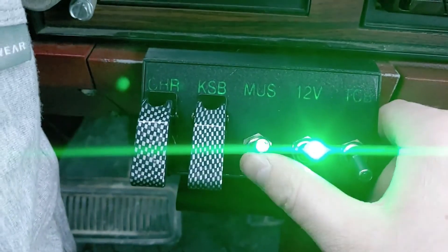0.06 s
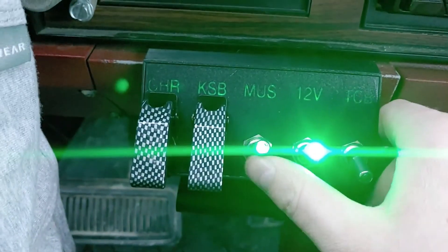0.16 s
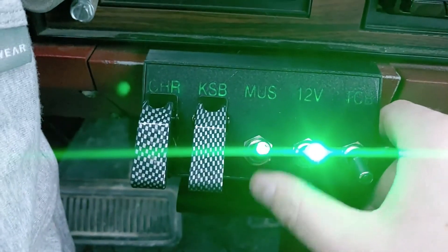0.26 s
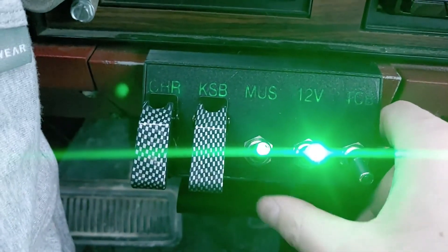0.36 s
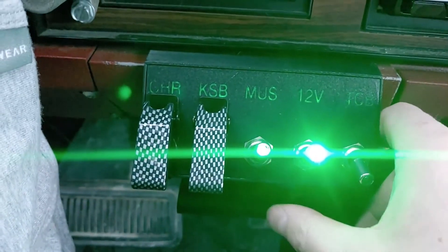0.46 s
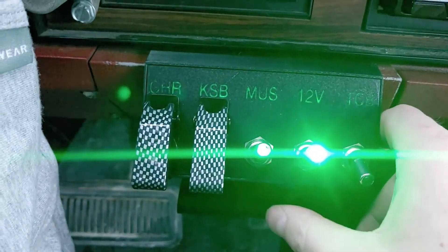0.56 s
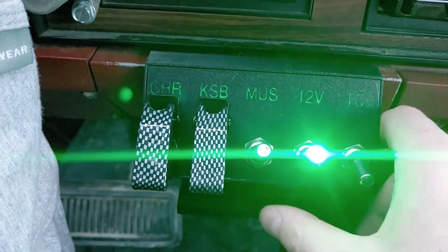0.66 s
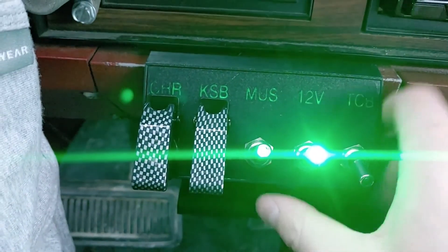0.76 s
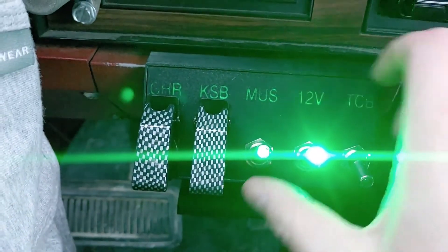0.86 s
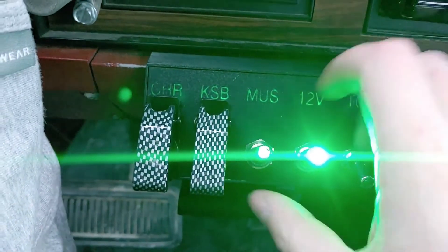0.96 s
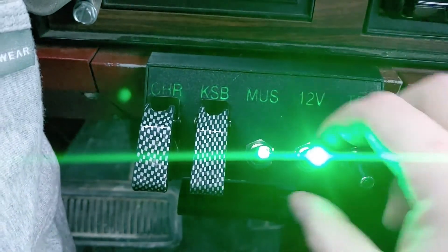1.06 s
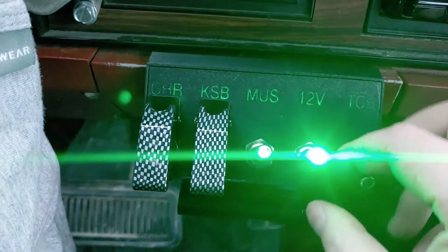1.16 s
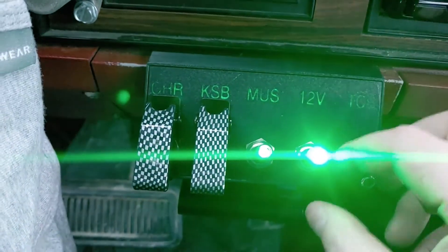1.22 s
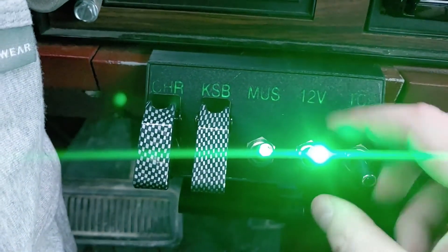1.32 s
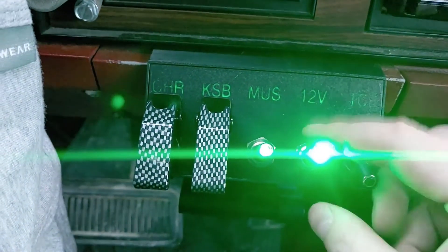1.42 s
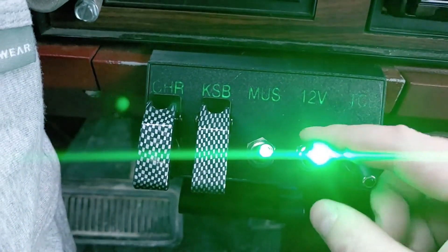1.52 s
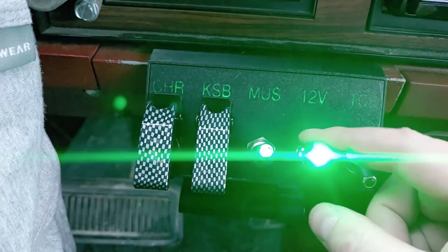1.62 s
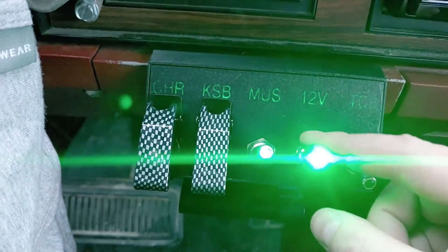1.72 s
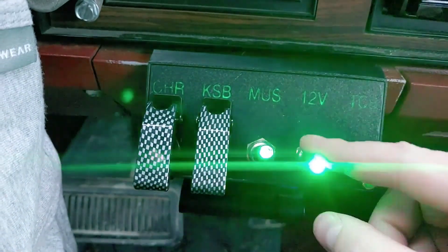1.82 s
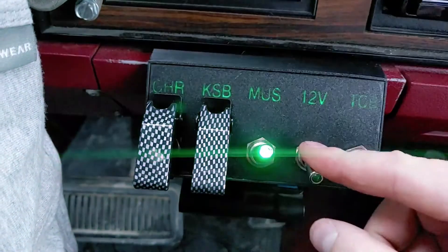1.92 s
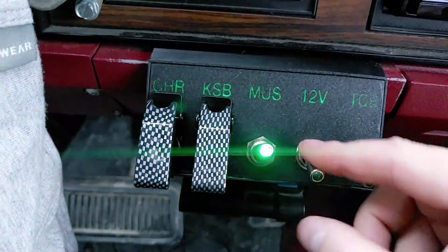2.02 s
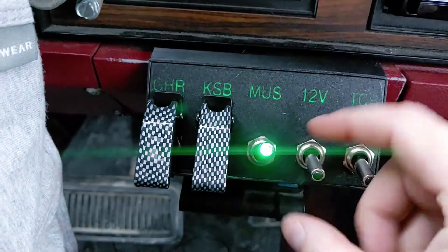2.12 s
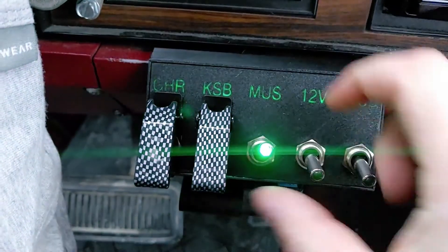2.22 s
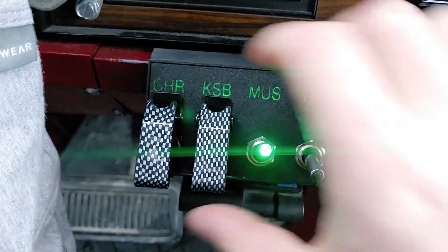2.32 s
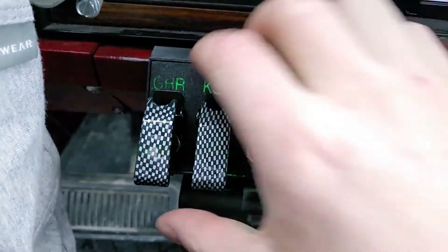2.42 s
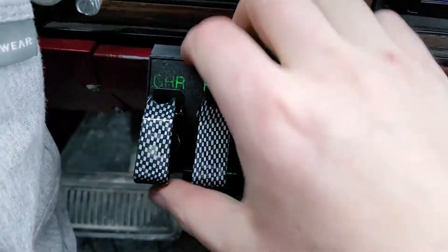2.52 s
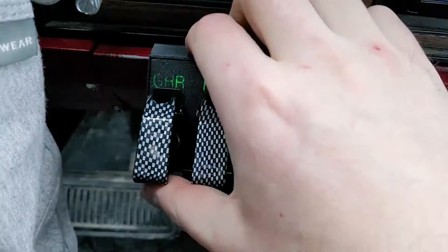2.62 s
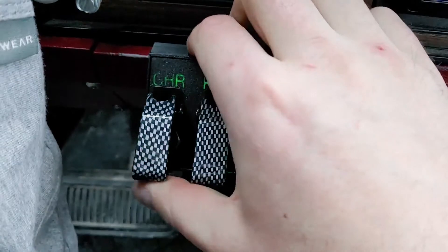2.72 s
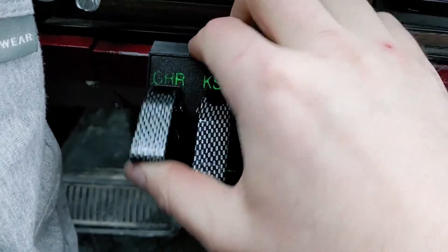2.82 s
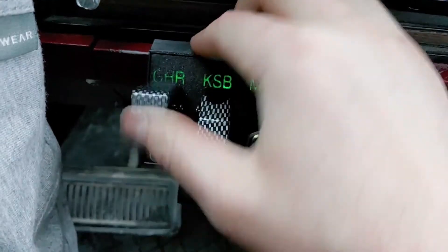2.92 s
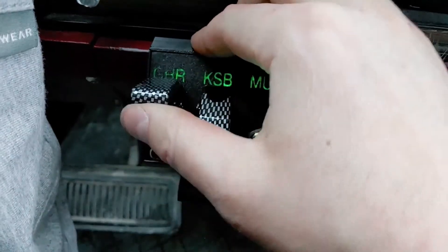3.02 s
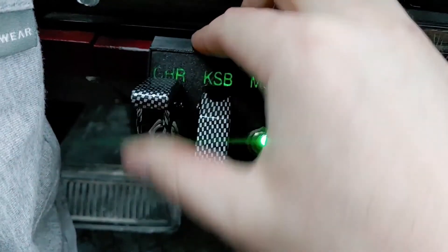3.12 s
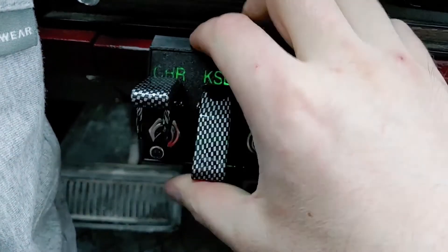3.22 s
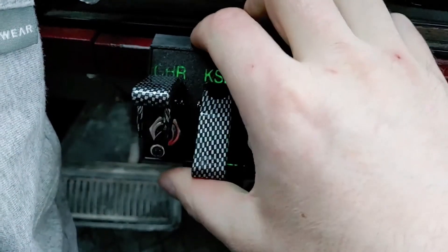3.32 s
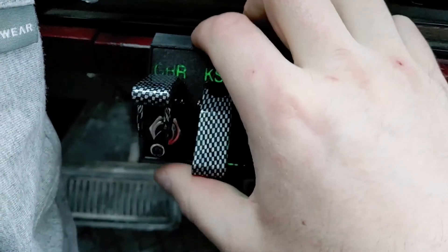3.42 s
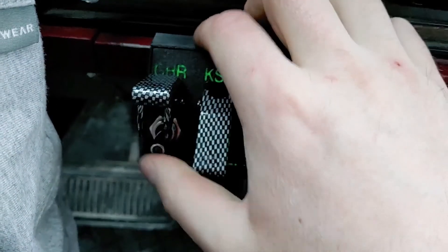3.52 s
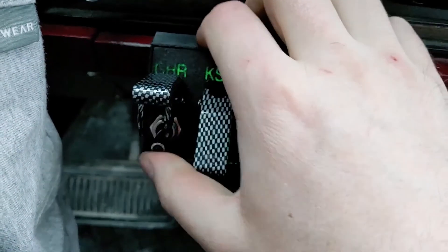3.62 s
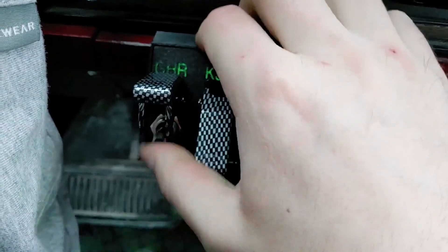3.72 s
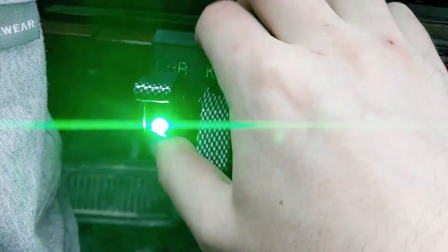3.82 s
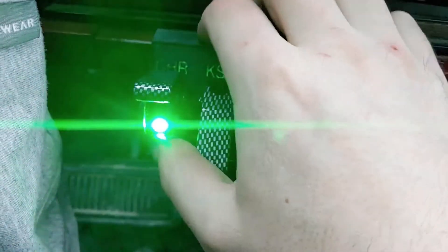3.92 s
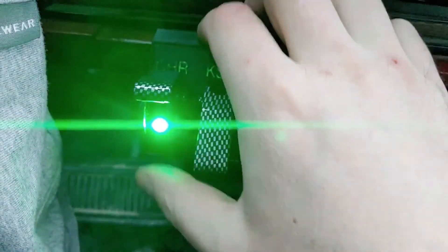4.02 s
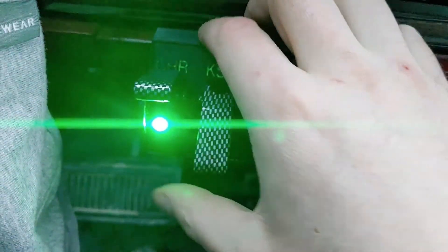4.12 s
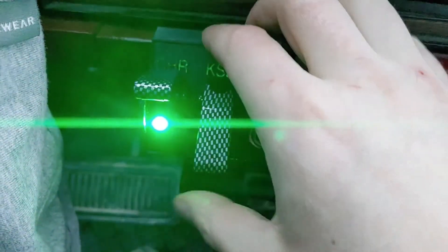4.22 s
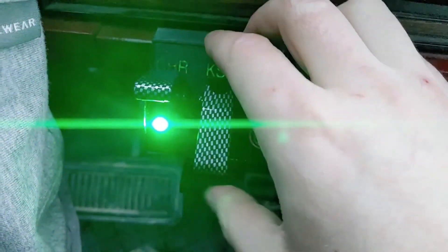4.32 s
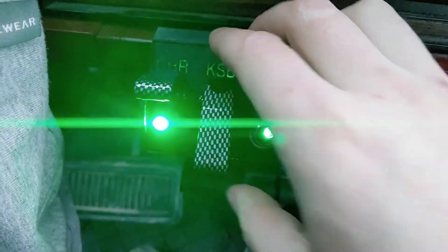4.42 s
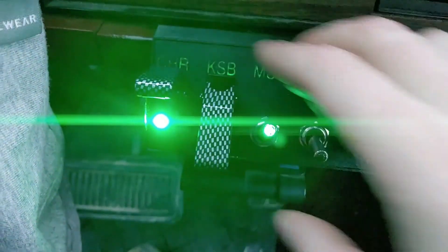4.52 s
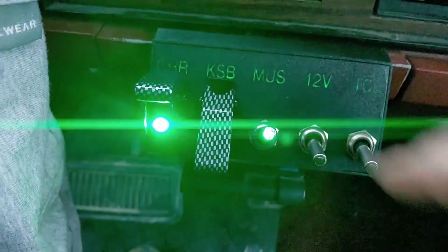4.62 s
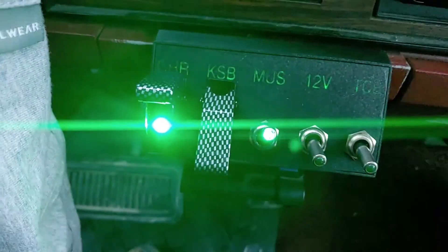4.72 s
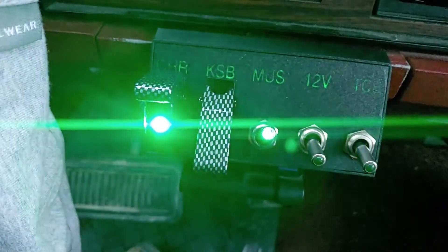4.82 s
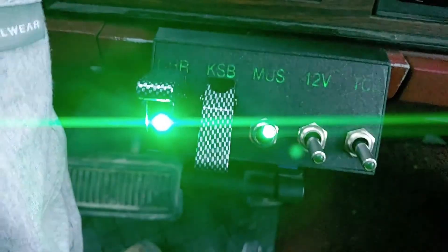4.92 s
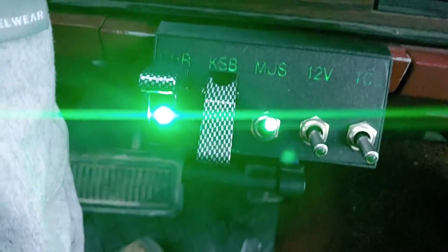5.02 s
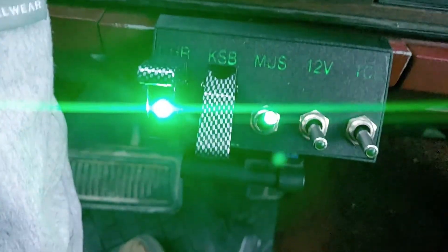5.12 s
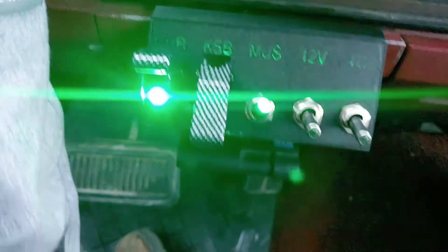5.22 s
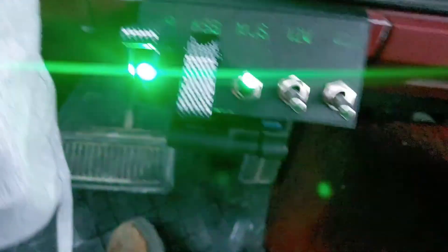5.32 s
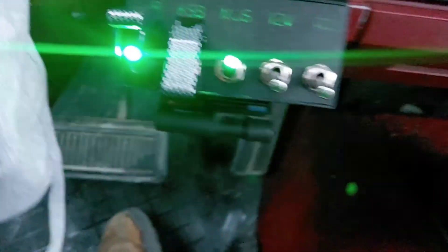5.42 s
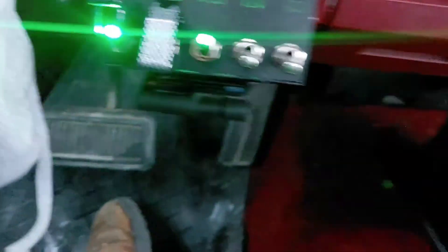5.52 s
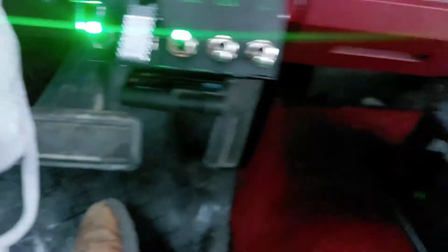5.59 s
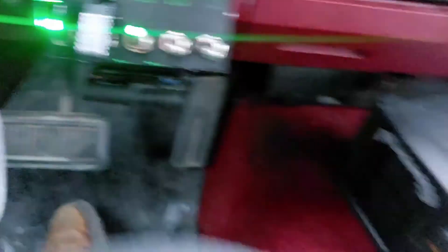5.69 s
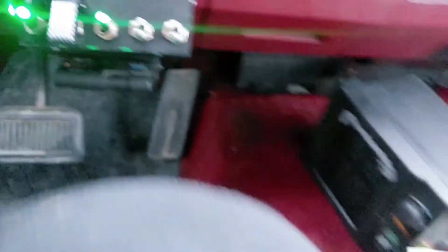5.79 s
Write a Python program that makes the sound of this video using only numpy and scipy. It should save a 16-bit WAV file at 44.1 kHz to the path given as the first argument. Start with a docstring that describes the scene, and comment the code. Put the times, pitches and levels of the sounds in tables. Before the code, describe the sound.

Four short metallic switch sounds, with faint finger ticks and sleeve rustle between them, in a dry vehicle cab. The second is loudest and silences a light fan hiss; the fourth is followed by loose guard chatter and a faint high electric whine that fades at the end. The close stereo microphone is buffeted by bassy gusts on the right, popped dully on the left, over engine-like rumble and heater hiss.

```python
"""Toggle switches snap on a small panel under the dash of a parked truck, and a hinged guard is lifted.
Each snap is a set of decaying modes with a crack of dense noise, a softer stop and a short cab echo; the guard rattles.
Hand and sleeve rustle as shaped noise with tiny ringing snags; dull pops sound close to the left port.
A small fan, made of noise, stops at the second toggle; a thin whine of sines starts after the guarded one.
Behind them a draught of gated turbulence buffets the right microphone port, over steady cab rumble and hiss."""
import sys
import numpy as np
from scipy import signal
from scipy.fft import rfft, irfft, next_fast_len
from scipy.io import wavfile
from scipy.ndimage import uniform_filter1d

SR = 44100
rng = np.random.default_rng(int(sys.argv[2]) if len(sys.argv) > 2 else 0)


def wrap_up_sound(samples):
    """Save the sound to the file named by the first command line argument, as 16-bit audio."""
    columns = np.atleast_2d(samples).T
    # keep every value between -1 and 1, then stretch to whole-number steps
    tamed = np.clip(columns, -1, 1)
    steps = np.round(tamed * 32767).astype(np.int16)
    wavfile.write(sys.argv[1], SR, steps)


N = 258189
TIME = np.arange(N) / SR

# switch snaps: start_s, body, snap_db, crack_db (against the ring), crack_t60_s, stop_delay_s (lever to its stop),
# stop_db, reflections_db (against the snap), echo_db, left_minus_right_db
SNAPS = [(.0099, "first toggle", -17.5, 0.5, 0.023, .0021, -18, -1.5, -35.5, 6.5),
         (1.8732, "second toggle", -6.5, -6, 0.018, .0023, -20.5, 4, -34, 2.5),
         (2.9525, "guard", -34, 7, 0.023, .0019, -24, -8, -35.5, 3.5),
         (3.7759, "guarded toggle", -27.5, 9, 0.026, .0026, -21, -4, -30, 6)]
# modes of each switch with its panel, by body: pitch_hz, level_db, t60_s
RINGS = { "first toggle": [(660, 5, .014), (900, -1, .008), (1260, 5, .016), (1550, 1, .014),
         (2150, -4, .008), (2850, 7, .011), (3700, 8, .011), (4300, 1, .008), (7000, -3, .012),
         (9000, -4, .01), (13700, -9, .016)], "second toggle": [(680, -7, .013), (1250, -4.5, .017),
         (1640, -16, .03), (1848, -14, .04), (2100, -11, .038), (2600, -1, .007), (2900, -6, .014),
         (3400, 9, .0075), (4000, 3, .007), (4530, -4, .011), (6960, -13, .015), (8400, -9, .0045),
         (13700, -16, .014)], "guard": [(520, 6, .02), (1235, 12, .012), (1780, 2, .011), (2450, 4, .014),
         (3200, 8, .008), (4250, 10, .012), (4680, 3, .014), (6600, -7, .013), (9350, -7, .011),
         (12100, -9, .014)], "guarded toggle": [(1160, 4, .018), (1330, 0, .018), (1780, 4, .018),
         (1900, -4, .016), (2480, -2, .016), (3625, -2, .02), (4020, 0, .018), (5420, -13, .016),
         (6560, -10, .013), (9200, -12, .011), (12100, -5, .009)]}
# crowded small modes of each switch, by body: frequency_hz, relative_level_db_per_hz
CRACKS = { "first toggle": [(400, 0), (800, 8), (1250, -2), (1900, 8.5), (3200, 9), (4300, 9), (5400, 3),
          (6800, 7), (8500, -9), (10200, 2), (11400, -6.5), (13600, 2), (15800, -20)],
          "second toggle": [(400, -6), (750, -17), (1250, 15), (2100, 14), (3300, 8), (4400, 1), (5400, 3),
          (6800, 7.5), (8600, 3), (10200, 6), (11400, -15), (13600, 2), (15800, -6)], "guard": [(500, 6),
          (1000, 0), (1800, -7), (2400, 2), (3300, 5), (4400, 5), (5300, -5), (6700, -2), (7800, -6),
          (9400, -1), (11200, -10), (12500, -10), (15800, -26)], "guarded toggle": [(500, -14), (900, -9),
          (1250, -5), (1900, -3), (2900, 2), (4100, 3), (5500, -11), (6600, -1), (8000, -14), (9200, -3),
          (11200, -20), (12400, -2), (15800, -30)]}
# how much a mode's strength varies from snap to snap
MODE_SPREAD_DB = .5
# reflections from floor and seat, smeared by their uneven faces: delay_s, level_db, spread_s
REFLECTIONS = [(0.01, -17, 0.0072), (0.023, -26, 0.013)]
# colour of snaps scattered by the cab: frequency_hz, relative_level_db_per_hz
SNAP_ECHO = [(400, -13), (800, 1), (1250, 5.5), (2000, 2), (3500, -6), (5300, -7), (6800, -10.5),
             (7900, -19.5), (9500, -21), (11200, -30), (13500, -16), (16000, -21.5)]
# the treble dies quickly in the upholstered cab
CAB_T60_S, TREBLE_T60_S = 0.16, .055

# modes of the loose guard: pitch_hz, level_db, t60_s
RATTLE_MODES = [(1560, -6, .016), (1800, 1.5, .018), (2100, -2, .016), (2520, -5, 0.014), (3080, -9, .01),
                (3900, -16, 0.0077), (6500, -21, 0.0054)]
# the open guard rattles on its hinge after its switch is thrown; the gap is the mean between contacts
RATTLE_START_S, RATTLE_LENGTH_S, RATTLE_GAP_S = 3.801, .04, 0.0046
RATTLE_DB, RATTLE_LOSS_DB_PER_S, RATTLE_PAN_DB = -36.5, 220, 11

# light ticks and scrapes of fingers on the panel: peak_s, level_db, centre_hz, width_hz, rise_s, t60_s
TICKS = [(.782, -43, 2220, 402, 0.0099, 0.21), (1.14, -58.5, 10500, 6950, .008, 0.1),
         (2.566, -44.5, 2700, 1300, 0.0091, 0.045), (2.6981, -42, 5900, 5000, 0.00042, 0.006),
         (2.815, -63, 4400, 500, .01, 0.14), (3.549, -53, 3440, 1800, 0.012, 0.06),
         (4.988, -54, 9500, 7100, .0005, 0.017)]
# strokes of the hand and sleeve: middle_s, level_db, length_s
STROKES = [(0.789, -47, 0.085), (0.917, -62.5, 0.039), (1.135, -60, 0.15), (2.44, -60.5, 0.33),
           (2.57, -62, .03), (4.245, -62, 0.082), (4.483, -57, 0.13), (4.743, -64.5, 0.21),
           (5.302, -63, 0.51), (5.843, -59.5, 0.27)]
RESTING_HAND_DB = -77
# colour of the rubbing sleeve: frequency_hz, relative_level_db_per_hz
SLEEVE = [(600, 0.5), (1300, 8), (2300, -2.5), (3500, -2.5), (5300, -8.5), (6700, -5), (7800, -15),
          (9400, -9), (11100, -25.5), (12600, -11), (15500, -19)]
# threads of the sleeve catch and slip; level is against the rubbing, spread is of their sizes
SNAGS_PER_S, SNAG_DB, SNAG_SPREAD_DB = 230, -3, 3.5

# colour of the small accessory fan: frequency_hz, relative_level_db_per_hz
FAN = [(500, 10.5), (1200, 4), (1800, -0.5), (2400, -1.5), (3400, -4), (3950, -12), (4600, -10.5),
       (5500, -20), (6700, -19), (8000, -34), (14000, -50.5)]
FAN_STOP_S = 1.87
# partials of the electric whine: multiple, level_db (rms before panning)
WHINE = [(2, -76), (3, -74), (4, -87)]
WHINE_HZ, WHINE_START_S = 1225.7, 3.85
# the whine fades as the microphone turns away from the panel
TURN_AWAY_S, TURN_AWAY_T60_S = 5.25, 1.8

# dull pops close to the left port: start_s, click_db, click_length_s, thump_db, thump_delay_s, echo_db
POPS = [(1.2226, -15.5, .00059, -13.5, 0.00074, -34), (5.2583, -16.5, 0.0006, -14, 0.0005, -41.5)]
# colour of a pop scattered by the cab: frequency_hz, relative_level_db_per_hz
POP_ECHO = [(300, -8), (800, 10.5), (1300, 9), (2000, 4), (2800, 6), (4200, -6), (5400, -19), (6700, -13.5),
            (8000, -39)]

# gusts of the draught on the right port: start_s, length_s, level_db
GUSTS = [(0.028, 0.045, -14.5), (0.129, 0.029, -18), (0.245, 0.068, -19), (0.387, 0.019, -20),
         (0.421, 0.022, -16), (0.506, 0.038, -20), (0.57, 0.11, -26), (0.645, 0.024, -16),
         (0.704, 0.028, -22.5), (0.756, 0.012, -16.5), (0.776, 0.091, -22), (0.861, 0.051, -18.5),
         (0.942, 0.014, -20.5), (1.046, 0.033, -15.5), (1.105, 0.079, -17.5), (1.236, 0.089, -18),
         (1.348, 0.18, -31.5), (1.452, 0.025, -18), (1.527, 0.11, -17.5), (1.666, 0.023, -26.5),
         (1.72, 0.029, -19.5), (1.799, 0.012, -14), (1.828, 0.13, -21), (2.076, 0.027, -18),
         (2.136, 0.1, -23.5), (2.275, 0.018, -15.5), (2.333, 0.15, -18), (2.489, 0.086, -22.5),
         (2.62, 0.044, -22), (2.704, 0.043, -16), (2.836, 0.011, -17), (2.868, 0.1, -21.5), (3, 0.03, -18),
         (3.041, 0.056, -15.5), (3.123, 0.041, -17), (3.166, 0.12, -23.5), (3.268, 0.091, -16.5),
         (3.351, 0.041, -21), (3.4, 0.079, -24.5), (3.472, 0.045, -20.5), (3.546, 0.055, -13),
         (3.629, 0.027, -18.5), (3.693, 0.032, -16.5), (3.762, 0.043, -22.5), (3.85, 0.044, -19),
         (3.915, 0.018, -19), (3.974, 0.078, -23), (4.109, 0.013, -18), (4.133, 0.035, -25.5),
         (4.215, 0.026, -16.5), (4.254, 0.053, -18.5), (4.342, 0.017, -22.5), (4.407, 0.034, -19),
         (4.505, 0.018, -25.5), (4.588, 0.014, -23), (4.643, 0.032, -19.5), (4.706, 0.018, -23),
         (4.775, 0.02, -26), (4.813, 0.033, -20), (4.875, 0.02, -24), (5.042, 0.034, -21),
         (5.075, 0.041, -20), (5.134, 0.02, -24), (5.216, 0.011, -23.5), (5.248, 0.21, -20),
         (5.445, 0.027, -17.5), (5.489, 0.036, -20.5), (5.599, 0.038, -26)]
# every gust builds quickly, sags while it blows and dies away
GUST_ATTACK_S, GUST_SAG_DB_PER_S, GUST_RELEASE_T60_S = 0.0044, 10, 0.11
# weak flow between gusts, and when it begins to die away
LULL_DB, LULL_END_S = -34.5, 5.2
# the largest eddies, which thump on the right port: middle_s, peak_db, half_width_s
BUFFETS = [(0.051, -4, 0.0016), (0.277, -8, 0.00078), (0.442, -11, 0.0024), (0.666, -3, 0.00062),
           (0.692, 1.5, 0.0016), (0.879, -5.5, 0.0022), (0.912, -6.5, 0.0027), (1.076, -2.5, 0.00057),
           (1.111, -5.5, 0.00055), (1.304, -6.5, 0.0011), (1.475, -4, 0.001), (1.572, -10.5, 0.00074),
           (1.62, -2, 0.0008), (1.736, 0, 0.00082), (1.799, -1, 0.00075), (1.91, -5, 0.001),
           (2.362, -3, 0.00088), (2.375, -5.5, 0.00088), (2.554, -5.5, 0.0018), (2.853, -9, 0.0013),
           (2.916, -4, 0.0019), (2.96, -4.5, 0.001), (3.053, -4, 0.0009), (3.091, -5.5, 0.00094),
           (3.145, -4, 0.0013), (3.202, -2, 0.0015), (3.288, -1.5, 0.0014), (3.373, -4, 0.0013),
           (3.474, -4.5, 0.0011), (3.544, -4.5, 0.00057), (3.579, -5.5, 0.00057), (4.11, -6, 0.0024),
           (4.243, -6, 0.0015), (4.272, -12, 0.00073), (4.41, -4, 0.0011), (4.591, -6.5, 0.0013),
           (5.286, -3.5, 0.0014), (5.363, -7.5, 0.00066), (5.45, -2, 0.00088), (5.46, -7.5, 0.00062),
           (5.495, -7.5, 0.00073), (5.625, -10.5, 0.0023)]
# the flow comes in lumps, and each large eddy stirs it for a moment
LUMPY_FLOW_DB, STIR_DB, STIR_S = 2.5, -10.5, 0.018
# reference pressure from which both kinds of eddy grow or shrink
TYPICAL_DB = -21
# colours of slow and fine turbulence at the port: frequency_hz, relative_level_db_per_hz
SLOW_EDDIES = [(12, -21.5), (25, -15.5), (45, -0.5), (75, 2.5), (130, -1), (220, -12), (320, -20),
               (500, -38), (800, -49), (1500, -62)]
FINE_EDDIES = [(100, -16), (220, 10.5), (350, -2), (500, -9.5), (750, -20.5), (1100, -33.5), (2000, -54.5),
               (4000, -73)]

# colours of engine and heater heard in the cab: frequency_hz, relative_level_db_per_hz
RUMBLE = [(15, -15.5), (35, -13), (55, -6), (76, 5), (100, -2), (128, -2.5), (185, -11), (230, -1.5),
          (290, -12), (370, -8.5), (470, -10.5), (620, -14.5), (850, -39), (1300, -57.5)]
HEATER = [(500, 0), (900, 4.5), (1350, -3), (1800, -6.5), (2500, -7.5), (3500, -15), (4600, -20.5),
          (5600, -26.5), (6700, -23), (7800, -31.5), (9300, -29.5), (11100, -40), (12700, -28),
          (15500, -33.5)]
CUTOFF_HZ = 15800


def switches(stop_hz=1800, contact_s=0.000067, echo_rise_s=0.00076, dull_hz=4500):
    """The spring snaps the contacts over, the lever hits its stop, and the cab answers briefly."""
    out = np.zeros((2, N))
    t = TIME[:SR // 5]
    scatter = stereo_noise(SNAP_ECHO)
    dull = butter(scatter, dull_hz, "low")
    bright = butter(scatter, dull_hz, "high")
    for k, snap in enumerate(SNAPS):
        s, body, snap_db, crack_db, crack_t60, stop_s, stop_db, reflected_db, echo_db, pan_db = snap
        dying = decay(t, crack_t60)
        crack = np.linalg.norm(dying) * coloured(dense(dying), CRACKS[body])
        onset = 1 - np.exp(-t / contact_s)
        ring = (struck(RINGS[body], t) + from_db(crack_db) * crack) * onset * panned(pan_db)
        add(out, s, from_db(snap_db) * ring)
        # the stop is a softer contact, so it wakes only the low modes of the panel
        add(out, s + stop_s, from_db(stop_db) * butter(ring, stop_hz, "low", order=4))
        for delay, db, spread in REFLECTIONS:
            add(out, s, from_db(snap_db + reflected_db + db) * smeared(ring, delay, spread))
        # upholstery swallows the treble first; the two bands join in phase when subtracted
        part = slice(k * len(t), (k + 1) * len(t))
        echo = dull[:, part] * decay(t, CAB_T60_S) - bright[:, part] * decay(t, TREBLE_T60_S)
        add(out, s, from_db(echo_db) * panned(pan_db) * echo * (1 - np.exp(-t / echo_rise_s)))
    return out


def struck(modes, t, port_phase=1.95, port_hz=3000, lag_cycles=1.277, build_cycles=0.46):
    """A body rings after one hard contact: low modes start later, high ones differ more in phase between ports."""
    out = 0
    for (hz, db, t60), strength in zip(modes, rng.standard_normal(len(modes))):
        age = np.maximum(t - lag_cycles / hz, 0)
        port_offset = np.array([[-.5], [.5]]) * port_phase * hz / (hz + port_hz)
        phase = 2 * np.pi * hz * age + port_offset
        envelope = (1 - np.exp(-age * hz / build_cycles)) * decay(age, t60)
        out = out + from_db(db + MODE_SPREAD_DB * strength) * envelope * np.sin(phase)
    return out


def rattle():
    """The loose guard chatters in a dying run of uneven contacts."""
    out = np.zeros((2, N))
    gaps = rng.uniform(.4, 1.6, size=16) * RATTLE_GAP_S
    strengths_db = rng.normal(0, 2.5, size=16)
    for age, strength_db in zip(np.cumsum(gaps), strengths_db):
        if age < RATTLE_LENGTH_S:
            level_db = RATTLE_DB + strength_db - RATTLE_LOSS_DB_PER_S * age
            contact = struck(RATTLE_MODES, TIME[:SR // 20])
            add(out, RATTLE_START_S + age, from_db(level_db) * contact)
    return panned(RATTLE_PAN_DB) * out


def hand(grain_db=1.0):
    """Fingers tick on the panel; skin and cloth rub with a fine grain that swells with each stroke."""
    grain = from_db(grain_db * noise([(20, -5.0), (150, -0.5), (400, -25.0)]))
    rubbing = sum(from_db(db) * swell(s, length) for s, db, length in STROKES)
    out = (from_db(RESTING_HAND_DB) + rubbing) * grain * stereo_noise(SLEEVE)
    out += from_db(SNAG_DB) * rubbing * np.array([snags(), snags()])
    # time around the peak of a tick, negative while it rises
    t = TIME[:SR // 4] - TIME[SR // 20]
    for s, db, hz, width, rise, t60 in TICKS:
        tick = butter(rng.standard_normal((2, len(t))), [hz - width / 2, hz + width / 2], "band")
        envelope = np.where(t < 0, np.exp(-(t / rise) ** 2), decay(t, t60))
        add(out, s + t[0], from_db(db) * tick / tick.std() * envelope)
    return out


def snags(low_hz=1100, high_hz=6500, cycles=9, count=14):
    """Tiny slips of thread at random moments, each ringing briefly at one of several pitches; rms 1."""
    sizes_db = SNAG_SPREAD_DB * np.minimum(rng.exponential(1, N), 4)
    sizes = from_db(sizes_db) * rng.choice([-1, 1], N)
    slips = sizes * (rng.random(N) < SNAGS_PER_S / SR)
    pitch_index = rng.integers(0, count, N)
    t = TIME[:SR // 100]
    out = np.zeros(N)
    for k, hz in enumerate(np.geomspace(low_hz, high_hz, count)):
        ring = np.sin(2 * np.pi * hz * t) * decay(t, cycles / hz)
        out += signal.oaconvolve(slips * (pitch_index == k), ring)[:N]
    return out / out.std()


def accessories(fan_db=-48, fan_pan_db=4.0, run_down_s=0.018, whine_pan_db=8, waver_hz=0.94):
    """Fan noise dies away when its switch is thrown; a slightly wavering stack of sines whines later."""
    spinning = np.exp(-np.maximum(TIME - FAN_STOP_S, 0) / run_down_s)
    fan = from_db(fan_db) * spinning * stereo_noise(FAN)
    pitch_hz = WHINE_HZ + waver_hz * noise([(1, 0.5), (6, 0.5), (20, -38)])
    phase = 2 * np.pi * np.cumsum(pitch_hz) / SR
    whine = sum(from_db(db) * np.sqrt(2) * np.sin(multiple * phase) for multiple, db in WHINE)
    whine = whine * decay(np.maximum(TIME - TURN_AWAY_S, 0), TURN_AWAY_T60_S)
    fade_in = np.clip((TIME - WHINE_START_S) / 0.091, 0, 1)
    return panned(fan_pan_db) * fan + panned(whine_pan_db) * whine * fade_in


def pops(click_hz=2350, thump_width_s=0.00041, tail_db=-1, tail_t60=0.043,
         bounce_s=.011, bounce_length_s=0.0094, bounce_db=-3, right_db=-12):
    """By the left port: a very short click, a low thump just behind it, and a bounce from the cab."""
    out = np.zeros(N)
    scatter = evened(noise(POP_ECHO), span_s=0.0025)
    for s, click_db, click_s, thump_db, lag_s, echo_db in POPS:
        click = from_db(click_db) * swell(s, click_s) * np.cos(2 * np.pi * click_hz * (TIME - s))
        thump = from_db(thump_db) * eddy(s + lag_s, thump_width_s)
        tail = from_db(tail_db) * decay(TIME - s, tail_t60)
        bounce = from_db(bounce_db) * swell(s + bounce_s, bounce_length_s)
        # the thump is inverted: it sucks first, then pushes
        out += click - thump + from_db(echo_db) * (tail + bounce) * scatter
    return out * from_db([[0], [right_db]])


def draught(slow_db=4.0, slow_growth=0.98, fine_db=-8, fine_growth=1.587, lumpy_db=2.5,
            left_db=-20.0, yielding=0.45, wake_db=-24, wake_t60=0.0065, wake_hz=900):
    """Turbulence on the ports: stronger flow brings finer eddies, and single large ones thump."""
    pressure_db = air_pressure()
    excess_db = pressure_db - TYPICAL_DB
    lumps = from_db(lumpy_db * noise([(8, -12.5), (40, 10.5), (90, -30.5)]))
    slow_gain = from_db(TYPICAL_DB + slow_growth * excess_db + slow_db)
    slow = slow_gain * evened(noise(SLOW_EDDIES), span_s=0.024)
    fine_gain = from_db(TYPICAL_DB + fine_growth * excess_db + fine_db)
    fine = fine_gain * evened(noise(FINE_EDDIES), span_s=0.014) * lumps
    thumps = sum(from_db(db) * eddy(s, width) for s, db, width in BUFFETS)
    # a large eddy sweeps the small ones off the port and leaves a short, rough wake
    swept = np.tanh(4 * uniform_filter1d(np.abs(thumps), SR // 60))
    wake_gain = np.zeros(N)
    for s, db, width in BUFFETS:
        add(wake_gain, s - 2 * width, from_db(db + wake_db) * decay(TIME[:SR // 10], wake_t60))
    rough = evened(butter(noise(FINE_EDDIES), 540, "high"), span_s=0.0018)
    wake = butter(wake_gain * rough, wake_hz, "low", order=4)
    right = (slow + fine) * (1 - yielding * swept) + thumps + wake
    # the left port gets only weak, slow turbulence
    left = from_db(pressure_db + left_db) * noise(SLOW_EDDIES)
    return np.array([left, right])


def air_pressure():
    """Pressure in dB: the strongest gust or the weak flow between gusts, stirred by large eddies."""
    flow = from_db(LULL_DB) * decay(np.maximum(TIME - LULL_END_S, 0), GUST_RELEASE_T60_S)
    for s, length, db in GUSTS:
        flow = np.maximum(flow, from_db(db) * gust(s, length))
    flow = flow * from_db(LUMPY_FLOW_DB * np.tanh(noise([(8, 2), (20, 4.0), (35, -15.5)])))
    stirred = sum(from_db(db + STIR_DB) * swell(s + width, STIR_S) for s, db, width in BUFFETS)
    return 20 * np.log10(np.hypot(flow, stirred))


def gust(s, length):
    """Attack, sagging hold and release of one gust; height 1."""
    attack = np.clip(1 + (TIME - s) / GUST_ATTACK_S, 0, 1)
    hold = from_db(-GUST_SAG_DB_PER_S * np.clip(TIME - s, 0, length))
    return attack * hold * decay(np.maximum(TIME - s - length, 0), GUST_RELEASE_T60_S)


def eddy(s, half_width):
    """A passing vortex pushes on the port, then sucks; height 1."""
    u = np.clip((TIME - s) / half_width, -20, 20)
    return -u * np.exp((1 - u * u) / 2)


def cab(rumble_db=-36, heater_db=-50, heater_pan_db=1.0):
    """Steady rumble, mostly common to both ports, and heater hiss, independent at each."""
    rumble = from_db(rumble_db) * (noise(RUMBLE) + .4 * stereo_noise(RUMBLE))
    heater = from_db(heater_db) * panned(heater_pan_db) * stereo_noise(HEATER)
    return rumble + heater


def smeared(sound, delay_s, spread_s):
    """An uneven surface throws a sound back over many paths, with its energy about kept."""
    paths = dense(np.exp(-(2 * (TIME[:SR // 20] - delay_s) / spread_s) ** 2))
    return signal.fftconvolve(sound, paths, axes=1)


def dense(envelope, span_s=0.0022, count=4):
    """So many paths overlap in the envelope that no pitch stands out; one burst per port, energy 1."""
    x = rng.standard_normal((2, len(envelope))) * envelope
    # flatten the spectrum and restore the envelope in turn
    for _ in range(count):
        flat = irfft(np.exp(1j * np.angle(rfft(x))), len(envelope))
        x = evened(flat, span_s) * envelope
    return x / np.sqrt(np.sum(x * x, axis=1, keepdims=True) + 1e-18)


def coloured(x, spectrum):
    """A short sound through a causal filter of the given colour, with its energy about kept."""
    size = x.shape[-1]
    hz, db = np.transpose(spectrum)
    bins = np.fft.rfftfreq(size, 1 / SR) + 1
    gain = from_db(np.interp(np.log(bins), np.log(hz), db))
    # folding the cepstrum onto positive times gives the filter minimum phase
    cepstrum = irfft(np.log(gain / np.sqrt(np.mean(gain ** 2))), size)
    fold = np.where(np.arange(size) < size // 2, 1 + np.sign(np.arange(size)), 0)
    return irfft(rfft(x) * np.exp(rfft(cepstrum * fold)), size)


def noise(spectrum):
    """Noise of rms 1 with the given colour, rolled off beyond both ends of it."""
    hz, db = np.transpose(spectrum)
    size = next_fast_len(N)
    bins = np.maximum(np.fft.rfftfreq(size, 1 / SR), 1)
    colour = from_db(np.interp(np.log(bins), np.log(hz), db))
    edges = np.minimum(bins / hz[0], 1) ** 2 * np.minimum(hz[-1] / bins, 1) ** 3
    x = irfft(rfft(rng.standard_normal(size)) * colour * edges, size)[:N]
    return x / x.std()


def stereo_noise(spectrum):
    """Independent noise of one colour at each port."""
    return np.array([noise(spectrum), noise(spectrum)])


def evened(x, span_s):
    """Noise with its chance swells taken out."""
    return x / np.sqrt(uniform_filter1d(x * x, int(span_s * SR)) + 1e-6)


def butter(x, hz, kind, order=2):
    """Butterworth filter."""
    sections = signal.butter(order, np.clip(hz, 10, .45 * SR), kind, fs=SR, output="sos")
    return signal.sosfilt(sections, x + 1e-18)


def swell(s, length):
    """A smooth rise and fall around time s; height 1."""
    return np.exp(-(2 * (TIME - s) / length) ** 2)


def decay(t, t60):
    """Exponential decay that starts at t = 0, silent before."""
    return (t >= 0) * from_db(-60 * np.maximum(t, 0) / t60)


def from_db(db):
    """Decibels to gain."""
    return 10 ** (np.asarray(db) / 20)


def panned(pan_db):
    """Left and right gains for a level difference."""
    return from_db([[pan_db / 2], [-pan_db / 2]])


def add(out, s, sound):
    """Mix a short sound in at time s."""
    i = max(round(s * SR), 0)
    out[..., i:i + sound.shape[-1]] += sound[..., :N - i]


def scene():
    """Everything that reaches the two ports."""
    return switches() + rattle() + hand() + accessories() + pops() + draught() + cab()


def record(dry):
    """The loudest peaks are rounded off and the top is cut."""
    ceiling = .93
    rounded = dry / (1 + (dry / ceiling) ** 6) ** (1 / 6)
    top_cut = signal.ellip(10, .1, 80, CUTOFF_HZ, fs=SR, output="sos")
    return signal.sosfilt(top_cut, rounded)


dry = scene()
out = record(dry)
wrap_up_sound(out)
```